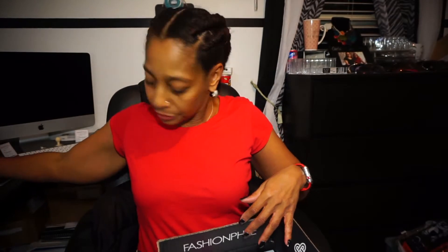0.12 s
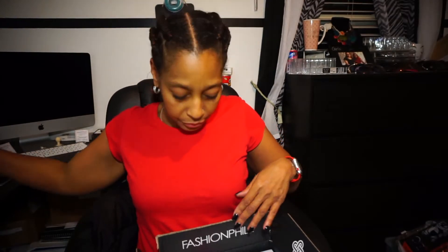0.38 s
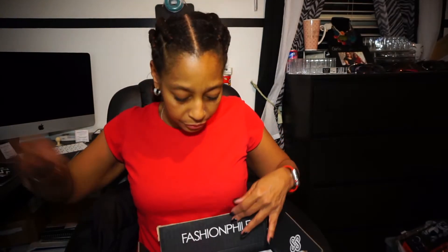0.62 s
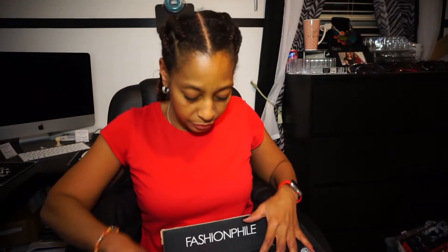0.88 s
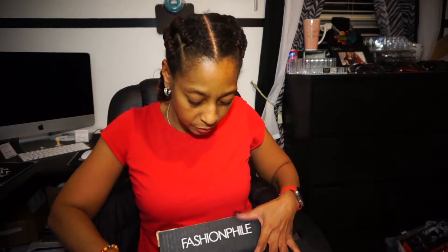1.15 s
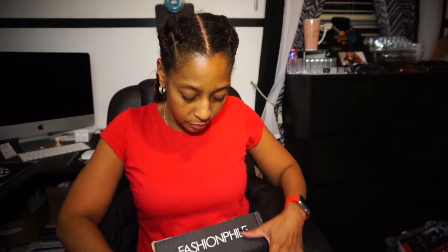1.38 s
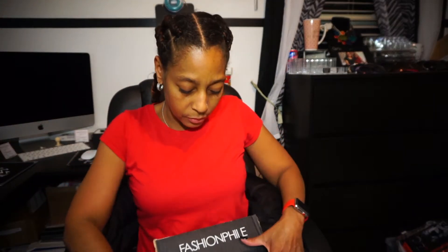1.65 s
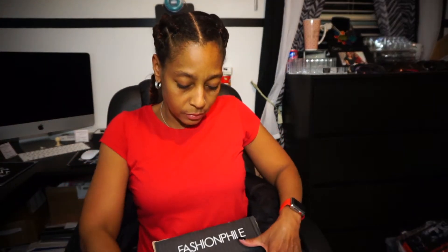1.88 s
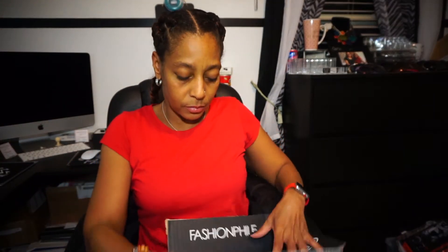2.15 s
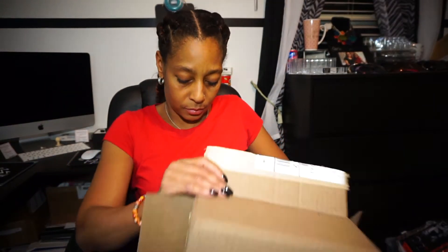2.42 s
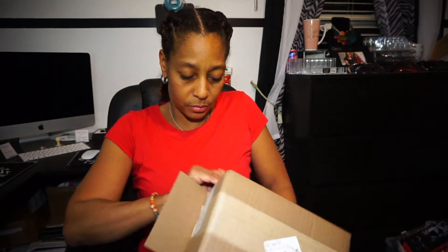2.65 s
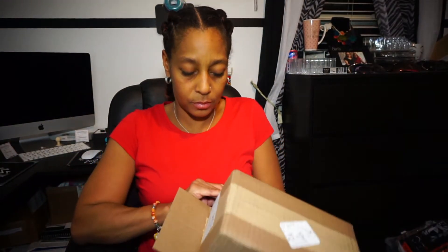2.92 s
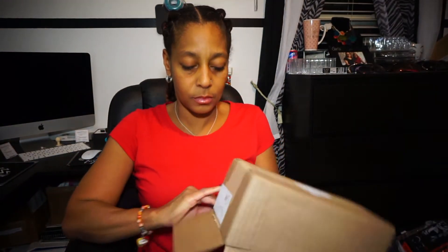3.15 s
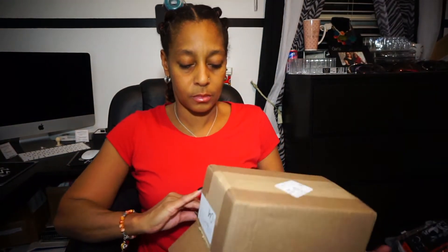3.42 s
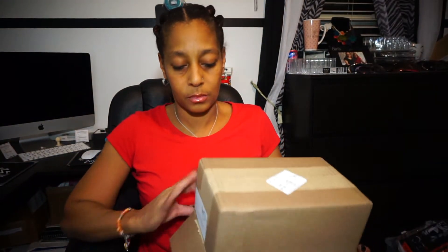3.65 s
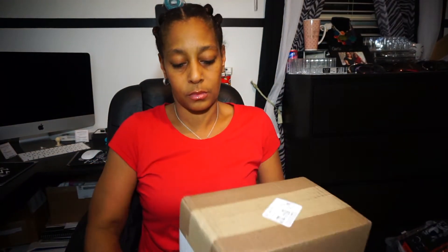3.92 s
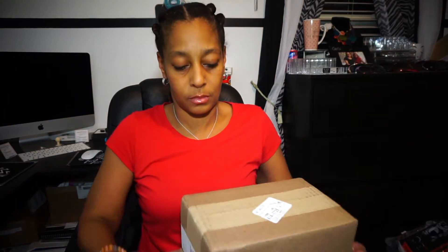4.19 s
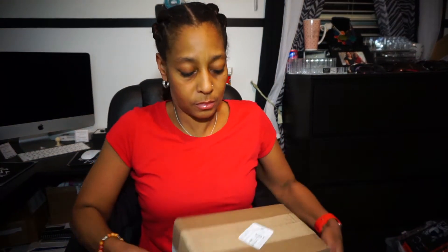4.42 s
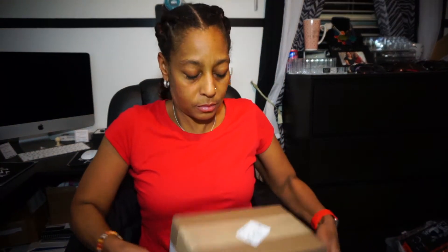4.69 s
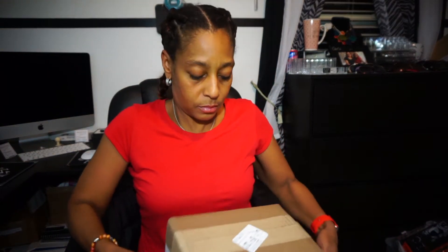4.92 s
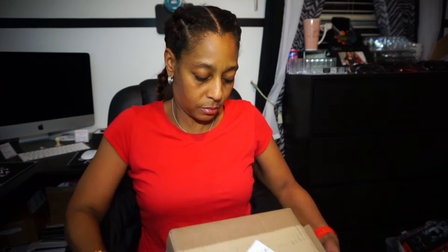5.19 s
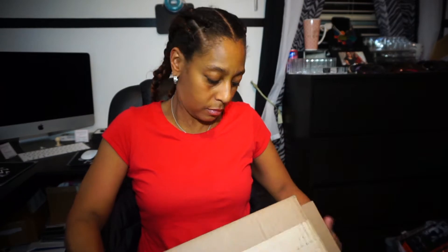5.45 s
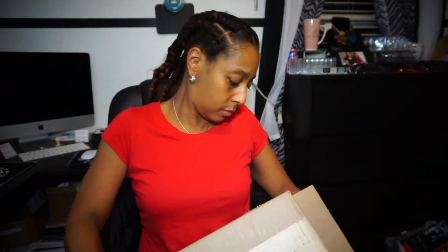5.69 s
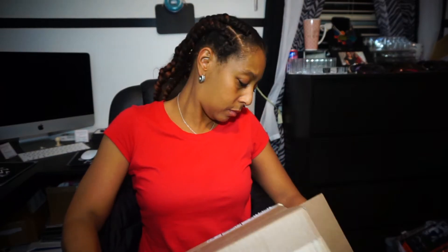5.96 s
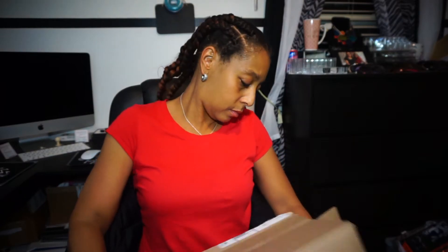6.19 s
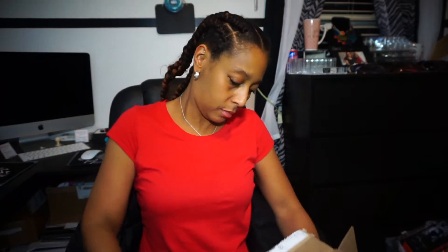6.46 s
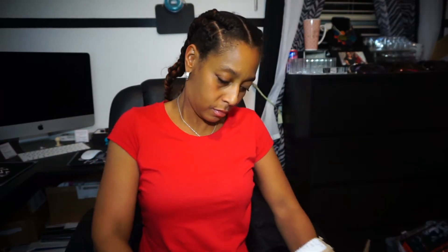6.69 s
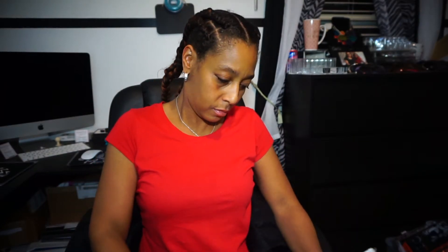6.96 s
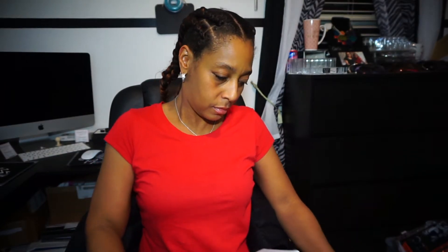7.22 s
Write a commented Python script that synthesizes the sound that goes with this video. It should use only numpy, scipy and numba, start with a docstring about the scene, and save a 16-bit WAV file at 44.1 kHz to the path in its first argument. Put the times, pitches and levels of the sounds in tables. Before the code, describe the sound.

Hands turn and knock an empty cardboard box close up, with papery rustling, hollow taps and crackling flaps in a small furnished room.

```python
"""Cardboard box in the hands

Hands turn, rub and knock an empty cardboard box close to a small stereo microphone in a furnished room.
Sliding contact is a dense stream of tiny slips; knocks and buckling flaps are short blows.
Both ring the panels, the hollow of the box and its stiff flaps; paper and skin add a hiss.
Bumps give soft thuds, the room answers, and a faint steady noise lies under it all."""
import sys
import numpy as np
from scipy import signal
from scipy.fft import rfft, irfft, next_fast_len
from scipy.io import wavfile
from scipy.ndimage import uniform_filter1d, map_coordinates
from numba import njit

SR = 44100
rng = np.random.default_rng(int(sys.argv[2]) if len(sys.argv) > 2 else 0)


def linear_from_db(decibels):
    """Turn decibels (scalar or array-like) into linear amplitude factors; 0 gives 1."""
    return 10 ** (np.asarray(decibels, float) / 20)


def wrap_up_sound(samples):
    """Save the sound to the file named by the first command line argument, as 16-bit audio."""
    columns = np.atleast_2d(samples).T
    # keep every value between -1 and 1, then stretch to whole-number steps
    tamed = np.clip(columns, -1, 1)
    steps = np.round(tamed * 32767).astype(np.int16)
    wavfile.write(sys.argv[1], SR, steps)


N = 323496

# knocks and buckles, levels before each part's own trim: (time [s], hollow level [dB],
# panels re hollow [dB], flaps re hollow [dB], rattle length [ms])
BLOWS = [(0.127, -27.5, -12, -10, 31), (0.245, -34, -4, 9.5, 6.6), (0.288, -20, -7.5, 4.5, 9),
         (0.774, -34.5, -5, -6, 8.1), (0.795, -30.5, 3.5, -0.5, 4.5), (0.88, -36, -2, 4, 11),
         (1.165, -25.5, -3, -5, 16), (1.184, -14.5, -15, -29, 5.8), (1.223, -23, -10, -22, 2.6),
         (1.283, -26.5, 3.5, -6, 7.5), (1.507, -15.5, -4.5, -14, 14), (1.831, -13.5, -1.5, -17, 12),
         (1.845, -21, -0.5, -3, 2.8), (1.911, -9, -7, -25, 3.7), (1.925, -8.5, -16, -25, 3.6),
         (1.951, -8.5, -19, -31, 3.3), (2.044, -18, -2, -21, 6.6), (2.073, -12.5, -8, -35, 8.7),
         (2.221, -21.5, -12, -15, 3.5), (2.471, -16.5, -12, -8.5, 15), (2.483, -9, -8.5, -2.5, 9.1),
         (2.502, -15.5, -9, 3, 12), (2.6, -10.5, -3.5, -2.5, 3.06), (2.734, -16.5, -8, -13, 7.5),
         (2.757, -7.5, -7.5, -23, 3.4), (2.807, -10, -6.5, -2.5, 4.4), (2.973, -27.5, -11, -10, 12),
         (3.052, -32.5, -8, -7, 16), (3.109, -37, 3, 9, 2.7), (3.19, -21.5, -31, -9, 19),
         (3.459, -18.5, -11, -26, 17.7), (3.733, -23, -2, -15, 3.7), (3.762, -14.5, -7, -1.5, 10),
         (3.873, -7, -30, -9, 5.2), (3.918, -26, 5, -8, 2.8), (3.954, -7.5, -11.5, -16, 12.8),
         (4.156, -10, -22, -24, 27), (4.228, -15, -11, 0, 2.6), (4.313, -12, -15, 1.5, 11),
         (4.325, -17, -16, 6, 7), (4.385, -31.5, 6, -1, 5.2), (4.623, -33, -1, 7.5, 5.8),
         (4.728, -26.5, 3.5, 2.5, 4.2), (4.796, -31, 10.5, -7, 9.9), (4.871, -25.5, 1, 4, 5.4),
         (5.133, -27, -15, -22, 5.6), (5.213, -37.5, 7.5, 1, 8.3), (5.275, -16.5, -26, -12, 10),
         (5.325, -15.5, -8, -12, 42), (5.413, -19, 10.5, 0, 6.3), (5.473, -25, 3.5, -12, 5.7),
         (5.524, -14, -11, -18, 3.9), (5.552, -9.5, -30, -9, 3.6), (5.636, -28.5, 3.5, 3, 4.3),
         (5.823, -27.5, -6.5, 7.5, 7.9), (5.9517, -12, -19, -4, 4), (6.08, -24.5, -22, -6, 6),
         (6.284, -14.5, -27, -22, 5.5), (6.315, -24.5, -4, -13, 3.9), (6.655, -21.5, -26, 4, 3.4),
         (6.835, -29, -8, -21, 5), (6.878, -31, -5, -33, 3.2), (6.9, -34, 0.5, -12, 21),
         (6.993, -19, -13, -10, 4.2), (7.092, -40, 4, -9, 8.2)]


def unit(x):
    """Scales x to an rms of 1."""
    return x / np.sqrt(np.mean(x ** 2))


def colour(x, points):
    """Shapes the spectrum of x by (frequency [Hz], level [dB]) points joined on a log axis."""
    size = next_fast_len(N)
    hz, db = np.transpose(points)
    axis = np.log(np.arange(size // 2 + 1) * SR / size + 1)
    gain = linear_from_db(np.interp(axis, np.log(hz + 1), db))
    return irfft(rfft(x, size) * gain, size)[..., :N]


def curves(table):
    """Columns of a timed table, joined by straight lines to one value a sample."""
    time_s, *columns = np.transpose(table)
    return [np.interp(np.arange(N) / SR, time_s, column) for column in columns]


def wander(hold_ms):
    """Random values that slide from one to the next every hold_ms; spread a little under 1."""
    hold = int(hold_ms * SR / 1000)
    steps = np.repeat(rng.standard_normal(N // hold + 1), hold)
    return uniform_filter1d(steps, hold)[:N]


def ring(x, modes):
    """Sum of decaying modes, scaled so that white noise keeps its level."""
    t = np.arange(SR // 4) / SR
    response = sum(linear_from_db(db - 60 * t / t60) * np.sin(2 * np.pi * hz * t) for hz, db, t60 in modes)
    return signal.fftconvolve(x, response / np.sqrt(np.sum(response ** 2)))[:N]


@njit
def resonance(x, hz, width):
    """Band-pass with a moving centre, scaled so that white noise keeps its level."""
    y, band, low = np.empty(len(x)), 0., 0.
    for i in range(len(x)):
        g, k = np.tan(np.pi * hz[i] / SR), width / hz[i]
        v = (band + g * (x[i] - low)) / (1 + g * (g + k))
        band, low, y[i] = 2 * v - band, low + 2 * g * v, k * v
    return y * np.sqrt(SR / (np.pi * width))


def steep(x, hz, width):
    """The same resonance twice: dark skirts."""
    twice = resonance(resonance(x, hz, width), hz, width)
    return twice * np.sqrt(2 * np.pi * width / SR)


def swells(peak_s, rise_ms, fall_ms, *levels_db):
    """Each event swells to its peak and dies away, straight in dB (times per 10 dB); powers add."""
    step = 32  # samples between computed points
    t = np.arange(0, N + step, step) / SR
    late_ms = 1000 * (t - peak_s[:, None])
    rising = -late_ms / np.maximum(rise_ms, 1)[:, None]
    falling = late_ms / fall_ms[:, None]
    power = 10 ** -np.where(late_ms < 0, rising, falling)
    return [np.interp(np.arange(N) / SR, t, np.sqrt(linear_from_db(db) ** 2 @ power)) for db in levels_db]


def slips(flutter_db, hold_ms):
    """Fibres catch and let go: uneven tiny clicks over a smooth rub, in fluttering bunches."""
    slips_per_s, spread_db, click_share = 2500, 2.5, 0.52
    size = linear_from_db(spread_db * rng.exponential(size=N)) * rng.standard_normal(N)
    clicks = unit(size * (rng.random(N) < slips_per_s / SR))
    mix = click_share * clicks + (1 - click_share) * rng.standard_normal(N)
    return unit(linear_from_db(flutter_db * wander(hold_ms)) * mix)


def blows(contact_ms, rattle_db, sizes_db):
    """Force of every blow on one part: a short push, then a dying rattle."""
    force, t = np.zeros(N + SR), np.arange(SR // 8) / SR * 1000
    chance = rng.standard_normal((len(BLOWS), len(t)))
    push = np.sin(np.pi * np.clip(t / contact_ms, 0, 1)) ** 2
    for row, db, noise in zip(BLOWS, sizes_db, chance):
        start, length = int(row[0] * SR), row[-1]
        # a long event is a scrape: weak push, rattle that swells first
        envelope = np.exp(-t / length) * (1 - np.exp(-t / (0.13 * length)))
        rattle = linear_from_db(rattle_db) * noise * envelope
        force[start:start + len(t)] += linear_from_db(db) * ((2.58 / length) ** 1.83 * push + rattle)
    return force[:N]


def room_tone():
    """Faint steady noise of room and microphone, less of it in the side than in the mid."""
    # spectrum of the noise before it is set to its level: (frequency [Hz], relative level [dB])
    quiet = [(30, -26), (200, -14), (450, -3), (1500, 0), (3400, -3), (5000, -8), (10000, -7), (15500, -7)]
    mid, side = colour(rng.standard_normal((2, N)), quiet)
    return linear_from_db(-57.5) * unit(mid + 0.4 * side * np.array([[1], [-1]]))


def surface_hiss(stroke, blow_db):
    """Skin on paper: nearly smooth noise, thousands of fibres at once, with a tick at each blow."""
    # spectrum of the hiss: (frequency [Hz], level [dB])
    surface = [(2350, 4.5), (4000, -1.5), (5040, -4.5), (7790, -4), (11900, -4), (14900, -8), (15600, -6),
               (16000, -36)]
    # top of the hiss, added as a broad band: (time [s], level re the hiss [dB])
    sheen = [(0.3, -44), (0.76, 11), (1.0, -2.5), (1.4, -0.5), (2.0, -13), (2.5, -10), (2.8, -16),
             (3.2, -2.5), (3.7, -5), (4.3, -12.5), (5.0, -37), (5.6, -7), (6.2, -24), (7.0, -34)]
    sheen_hz, sheen_width_hz = 12100.0, 6300.0
    brush = rng.standard_normal(N) + 0.2 * slips(2.0, 16.0)
    ticks = blows(0.063, -7.5, 18 + 0.39 * blow_db)  # ticks vary less in level than the blows
    hiss = colour(stroke * (linear_from_db(4.0) * brush + ticks), surface)
    top = resonance(hiss, np.full(N, sheen_hz), sheen_width_hz)
    return hiss + linear_from_db(curves(sheen)[0]) * top


def hollow_ring(rub, blow_db, hollow_hz, clear_db):
    """Air in the box: a narrow ring over a broad skirt, both around a moving pitch."""
    ring_width_hz, skirt_width_hz, skirt_db = 65.0, 900.0, 0.5
    # the walls flex under the fingers: the ring wavers in pitch and clearness
    hollow_hz = hollow_hz * (1 + 0.022 * wander(45))
    clear_db = clear_db + 3.0 * wander(55.03)
    drive = rub * slips(3.6, 13) + blows(0.39, -5.5, blow_db - 0.5)
    clear = resonance(steep(drive, hollow_hz, 3000.0), hollow_hz, ring_width_hz)
    return linear_from_db(clear_db) * clear + linear_from_db(skirt_db) * steep(drive, hollow_hz, skirt_width_hz)


def panel_ring(rub, blow_db, panel_hz, panels_db):
    """Broad cardboard walls: fixed modes and one band that moves with the grip."""
    # modes of the panels: (frequency [Hz], relative level [dB], decay by 60 dB [s])
    panel_modes = [(398.7, 5.5, 0.15), (462, 12.5, 0.1), (490, 12.5, 0.15), (588.5, 14, 0.084),
                   (684, 19.5, 0.024), (820, 2.5, 0.14)]
    drive = linear_from_db(panels_db) * rub * slips(2.3, 14) + blows(0.7, 1.84, blow_db)
    return ring(drive, panel_modes) + linear_from_db(-2.5) * steep(drive, panel_hz, 230.0)


def flap_ring(rub, blow_db, flaps_db):
    """Stiff flaps: higher, mostly shorter modes and one broad band that wavers in pitch."""
    # modes of the flaps: (frequency [Hz], relative level [dB], decay by 60 dB [s])
    flap_modes = [(1667, 1.5, 0.095), (1912, 19, 0.021), (2202, 5.1, 0.045), (2500, 9.4, 0.0098),
                  (3030, 15, 0.0043), (3330, 6, 0.015)]
    drive = linear_from_db(flaps_db) * rub * slips(2.0, 11.0) + blows(0.25, -1.9, blow_db - 2)
    flap_hz = 2370 * (1 + 0.13 * wander(70))
    return ring(drive, flap_modes) + linear_from_db(3) * steep(drive, flap_hz, 890.0)


def thuds(rub, thud_db):
    """The whole box is bumped, set down or rubbed: soft noise rings its lowest modes."""
    # modes of the whole box: (frequency [Hz], relative level [dB], decay by 60 dB [s])
    thud_modes = [(197, -2.5, 0.022), (261.3, 4.5, 0.051), (304, 3.5, 0.069)]
    # bumps and settings down: (time [s], level [dB], nominal length [ms])
    thumps = [(0.808, -30.5, 30), (0.952, -30.5, 10), (1.192, -36, 38), (1.841, -27, 14), (2.499, -39, 41),
              (2.614, -43, 25), (2.819, -24.5, 18), (3.497, -55, 45), (3.766, -36, 24), (4.185, -44, 26),
              (4.395, -28, 20), (4.51, -28, 32), (4.639, -37, 43), (4.743, -25, 45), (4.809, -23.5, 39),
              (4.884, -26.5, 54), (5.029, -39, 16), (5.358, -45, 26), (5.417, -17, 13), (5.552, -39, 30),
              (5.632, -37, 42), (6.001, -43, 24), (6.156, -27.5, 21), (6.326, -33, 20), (6.949, -32.5, 36),
              (7.099, -41, 24)]
    bump_s, bump_db, bump_ms = np.transpose(thumps)
    bumps, = swells(bump_s, 0.45 * bump_ms, 0.63 * bump_ms, bump_db)
    drive = bumps * rng.standard_normal(N) + linear_from_db(thud_db) * rub * slips(6.8, 27)
    return ring(drive, thud_modes)


def box():
    """Rubbing and blows drive each part of the box; the stiffer the part, the sharper the contact."""
    # strokes of sliding contact, levels before trims: (peak time [s], rise [ms per 10 dB],
    # fall [ms per 10 dB], surface hiss level [dB], cardboard level [dB])
    strokes = [(0.246, 12, 110, -33, -48), (0.303, 46, 42, -31.5, -24), (0.735, 12, 134, -59, -45.5),
               (0.781, 12, 89, -48.5, -30), (0.951, 54, 70, -35, -55), (1.105, 41, 28, -39.5, -33.5),
               (1.225, 82, 111, -39, -31.5), (1.398, 63, 83, -34.5, -34), (1.533, 63, 42, -31.5, -26.5),
               (1.704, 87, 262, -32.5, -27), (1.848, 36, 24, -30.5, -24.5), (1.966, 37, 30, -32.5, -20),
               (2.058, 93, 120, -33, -26.5), (2.236, 38, 86, -65, -22.5), (2.319, 93, 25, -39, -19),
               (2.485, 6, 64, -29.5, -16.5), (2.605, -2, 42, -34.5, -17.5), (2.739, 42, 88, -32.5, -15),
               (2.861, 57, 17.5, -29.5, -15.5), (3.071, 245, 32, -44.5, -33.5), (3.201, 67, 63, -28.5, -22),
               (3.34, 16, 272, -42.5, -37), (3.464, 18, 63, -36, -29), (3.751, 45, 121, -28, -16.5),
               (3.892, 100, 68, -37, -22), (3.958, 15, 50, -24.5, -19), (4.104, 24, 87, -30.5, -31),
               (4.172, 26, 80, -28, -26), (4.316, 4, 47, -24.5, -18.5), (4.4, 25, 49, -26, -32),
               (4.476, 82, 79, -38.5, -25.5), (4.636, 15, 67, -31, -27.5), (4.776, 45, 36, -25.5, -28),
               (4.892, 27, 55, -24, -20.5), (5.026, 31, 39, -42, -30.5), (5.136, 139, 17, -43.5, -34),
               (5.214, 4, 400, -39, -40), (5.279, 12, 284, -38, -22.5), (5.425, 114, 52, -31, -17),
               (5.56, 17, 23, -25, -18), (5.66, 109, 196, -42.5, -29), (5.834, 44, 45, -40, -28),
               (5.903, 28, 18, -37, -33.5), (5.96, 6, 77, -42, -21.5), (6.159, 248, 56, -38, -38.5),
               (6.334, 136, 52, -37.5, -25.5), (6.406, 254, 23, -42, -36), (6.599, 113, 343, -45.5, -39),
               (6.756, 16, 69, -40, -53), (6.923, 115, 28, -42.5, -49), (7.033, 110, 60, -36.5, -22.5),
               (7.117, 104, 49, -34.5, -55), (7.214, 2, 356, -45.5, -46)]
    # the box is turned and regripped: (time [s], panels [Hz], hollow [Hz], clearness of hollow ring [dB],
    # then re the hollow's rub: rubbed panels [dB], rubbed flaps [dB], whole-box thud [dB])
    grip = [(0.3, 570, 1220, -29, -18, 2, -20), (0.72, 600, 1210, -5, -9, 8, -22),
            (0.85, 430, 1400, -20, -10, -15, 9), (1.2, 556, 1464, -10.5, 3.5, -10, -19),
            (1.35, 544, 1400, -17, 9.5, 6, -28), (1.55, 510, 1390, -18, 4.5, 3, -24),
            (1.9, 575, 1167, -7.5, -19, -11, -22), (2.3, 665, 1273, -11.5, -46, -5, -36),
            (2.62, 530, 1256, -9.5, -3, -1, -7), (2.88, 482, 1450, -20, -14, -12.5, -16),
            (3.22, 517, 1280, -4.5, -7.5, -1, -16), (3.47, 530, 1190, -3.5, 0.5, -1, 0.5),
            (3.76, 602, 1440, -20, 1, -5.5, -12), (4.18, 740, 1240, -21, -8, -1, -6),
            (4.4, 376, 1270, -26, -3, -2, -18), (4.85, 390, 1205, -25, 2, -1.5, 2),
            (5.4, 363, 1230, -35, -4, -10, -26), (5.56, 590, 1066, -2.5, 3.5, -1.5, 0.5),
            (5.75, 406, 1430, -25, 0.5, -1, -7), (5.96, 427, 1088, -5.5, -3, 2.5, -6),
            (6.28, 540, 1100, -10.5, -4, -5, -14), (6.55, 436, 1400, -13, 1, 0, -0.5),
            (7.05, 550, 1320, -29, -3, -6.5, -4)]
    hiss_stroke, rub = swells(*np.transpose(strokes))
    rub = linear_from_db(-11.5) * rub
    panel_hz, hollow_hz, clear_db, panels_db, flaps_db, thud_db = curves(grip)
    _, blow_db, on_panels_db, on_flaps_db, _ = np.transpose(BLOWS)
    sound = surface_hiss(hiss_stroke, blow_db)
    sound = sound + hollow_ring(rub, blow_db, hollow_hz, clear_db)
    sound = sound + panel_ring(rub, blow_db + on_panels_db, panel_hz, panels_db)
    sound = sound + flap_ring(rub, blow_db + on_flaps_db, flaps_db)
    sound = sound + thuds(rub, thud_db)
    # light walls this small radiate almost no bass
    high_pass = signal.butter(4, 261, "high", fs=SR, output="sos")
    return signal.sosfilt(high_pass, sound) + linear_from_db(-34) * sound


def smear(x, decay_ms):
    """Many close reflections: a short noise burst as response, evened out to add little colour."""
    t = np.arange(SR // 16) / SR * 1000
    burst = rfft(rng.standard_normal(len(t)) * np.exp(-t / decay_ms))
    response = irfft(burst / np.abs(burst) ** .8, len(t)) * np.exp(-t / 30)
    return signal.fftconvolve(x, response)[:N]


def scatter(near):
    """Desk and body scatter the sound within a few ms, along paths that shift as arms and box move."""
    late_samples = 40 + 40 * wander(90)
    spread = map_coordinates(smear(near, 4.2), [np.arange(N) - late_samples], order=3)
    return unit(spread) * np.std(near)


@njit
def walls(x, lags, gain, damp):
    """Eight delay lines that feed each other, duller on every round."""
    line, soft, out = np.zeros((8, 4096)), np.zeros(8), np.zeros((2, len(x)))
    for i in range(len(x)):
        total = 0.
        for k in range(8):
            soft[k] += (1 - damp) * (gain[k] * line[k, (i - lags[k]) & 4095] - soft[k])
            total += soft[k]
            out[k % 2, i] += soft[k] * (1 - (k & 2))
        for k in range(8):
            line[k, i & 4095] = x[i] + soft[k] - total / 4 + 1e-18
    return out


def room_echo(spread):
    """The furnished room answers: scattered sound goes round between the walls and dies away."""
    lags = np.array([613, 877, 1129, 1361, 1657, 1979, 2311, 2699])  # samples
    t60_s, damp = 0.25, 0.38  # decay before the damping, which shortens it in the treble
    gain = linear_from_db(-60 * lags / SR / t60_s)
    return linear_from_db(-10.5) * walls(smear(spread, 5.6), lags, gain, damp)


def scene():
    """The box close to the microphone, its echo, and the difference between the two ports."""
    # how much the ports differ, before a small lift: (frequency [Hz], side re mid [dB])
    port_width = [(60, -6), (110, -13), (200, -21), (380, -17.5), (700, -10.5), (1290, -7), (2380, -8),
                  (4400, 0), (8120, -5), (15000, -6.5)]
    near = box()
    spread = scatter(near)
    echo_mid, echo_side = room_echo(spread)
    side = linear_from_db(1.5) * colour(spread + echo_side, port_width) * np.array([[1], [-1]])
    return near + echo_mid + side + room_tone()


def roll_off(x):
    """The treble ends steeply here."""
    return signal.sosfilt(signal.butter(12, 16640, fs=SR, output="sos"), x)


def record(dry):
    """The recorder rounds the loudest peaks and cuts the top."""
    rounded = np.tanh(0.75 * dry) / 0.65
    low_pass = signal.ellip(8, .2, 60, 15950, fs=SR, output="sos")
    mix = signal.sosfilt(low_pass, rounded)
    return roll_off(mix)


dry = scene()
out = record(dry)
wrap_up_sound(out)
```